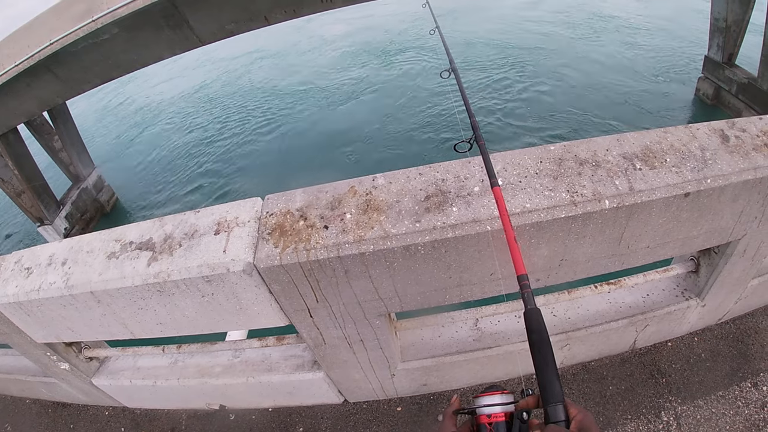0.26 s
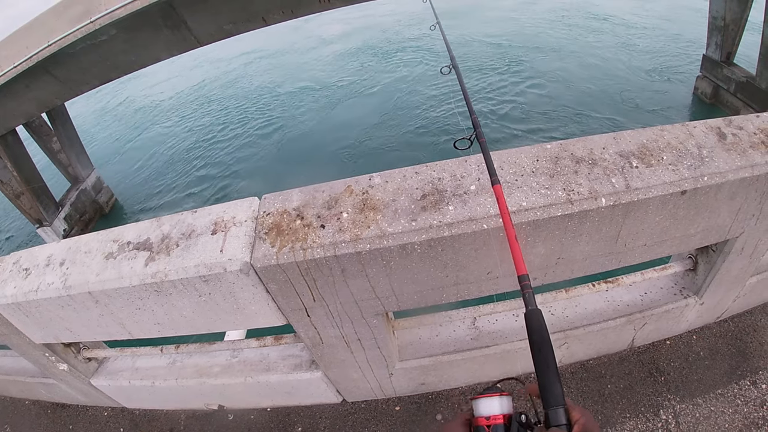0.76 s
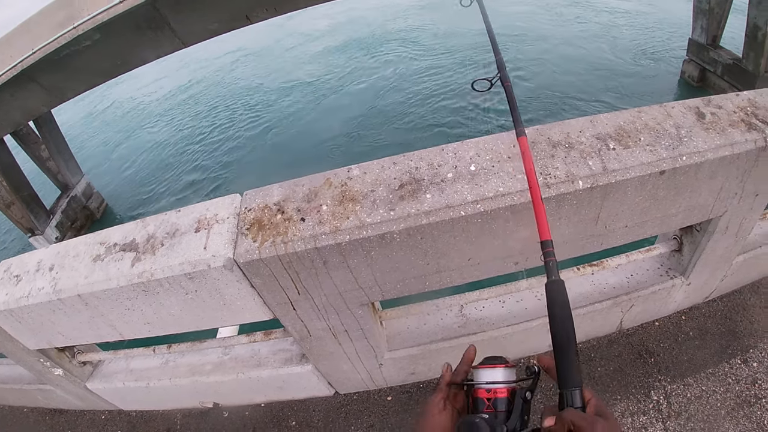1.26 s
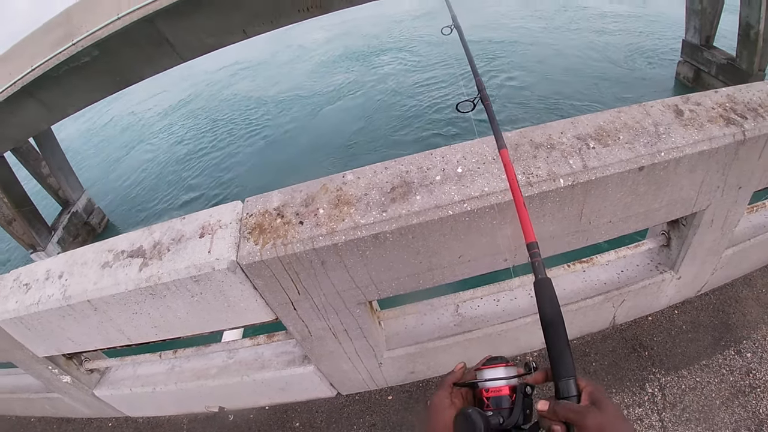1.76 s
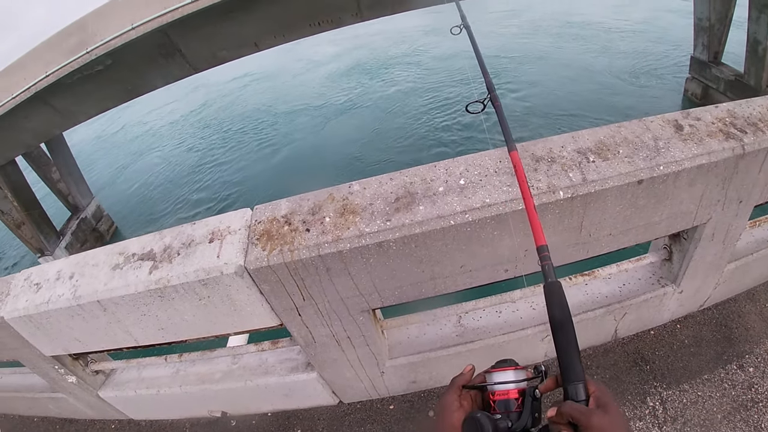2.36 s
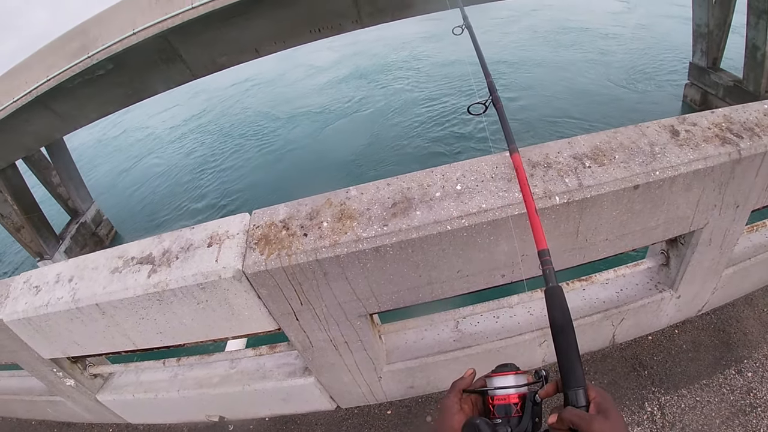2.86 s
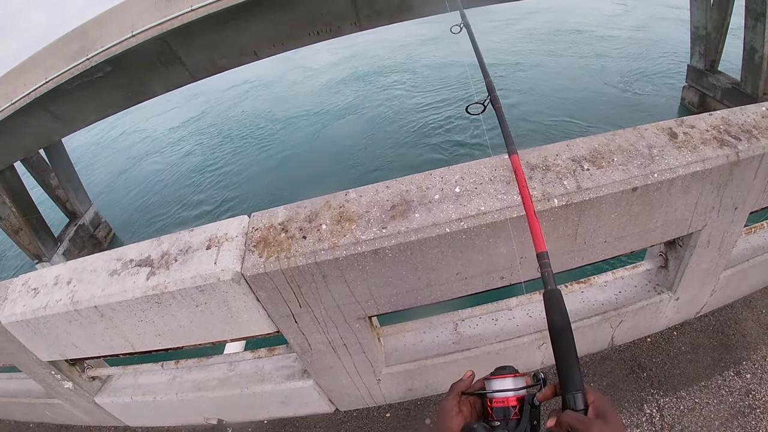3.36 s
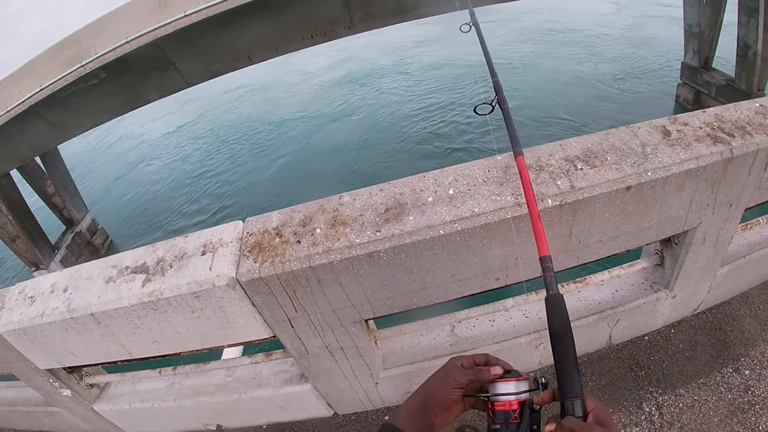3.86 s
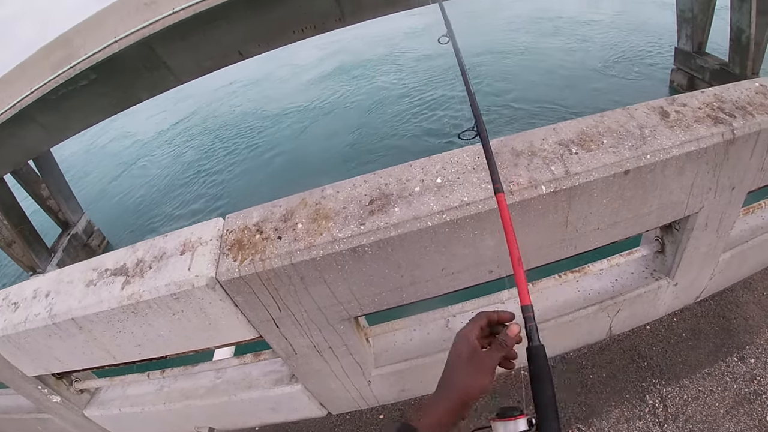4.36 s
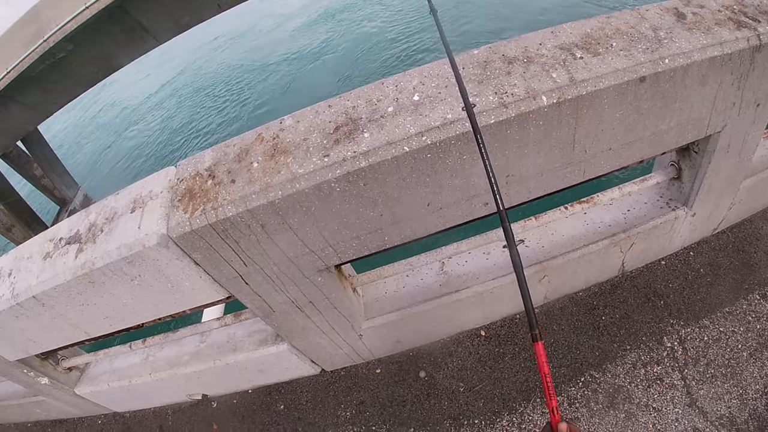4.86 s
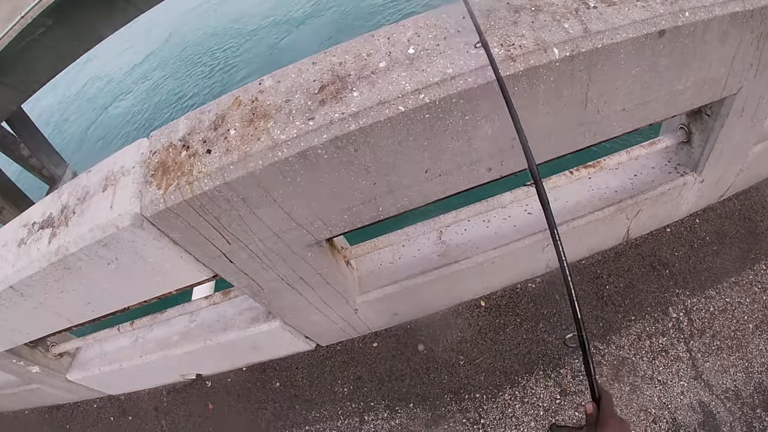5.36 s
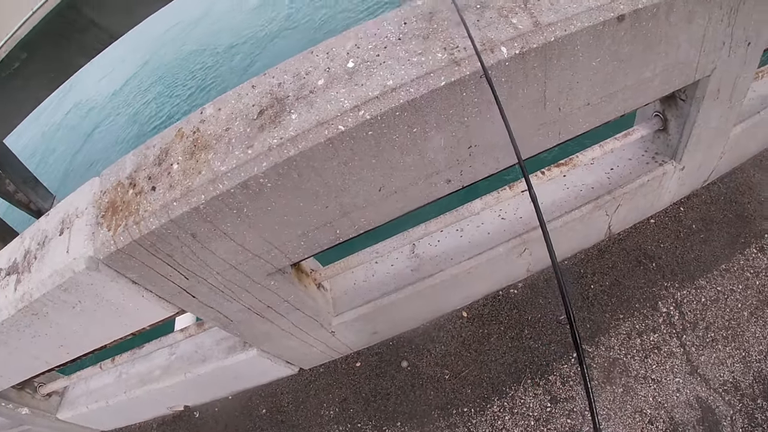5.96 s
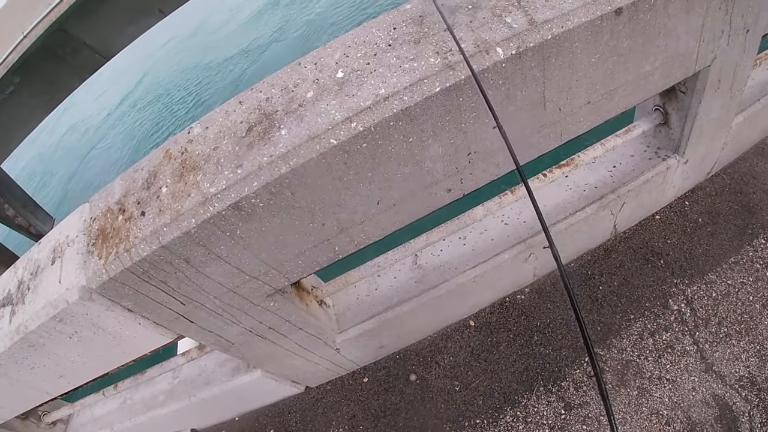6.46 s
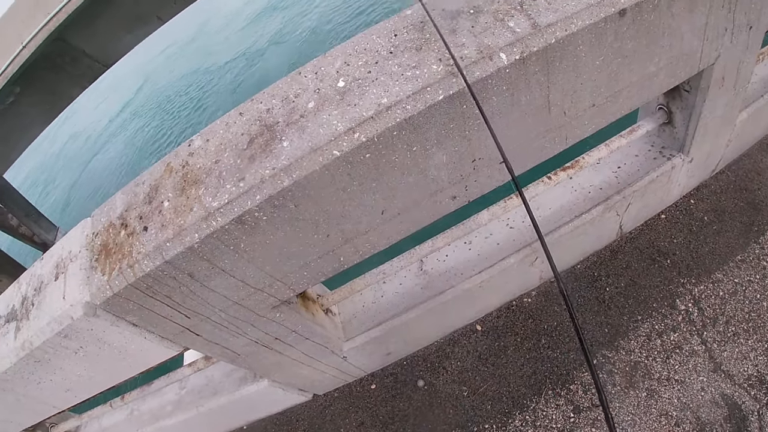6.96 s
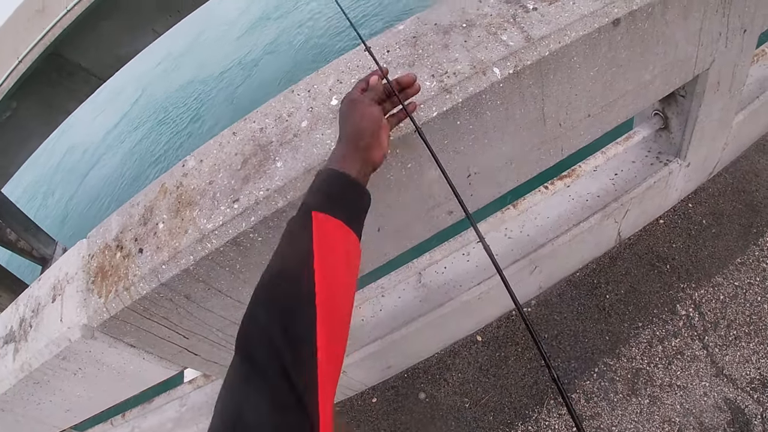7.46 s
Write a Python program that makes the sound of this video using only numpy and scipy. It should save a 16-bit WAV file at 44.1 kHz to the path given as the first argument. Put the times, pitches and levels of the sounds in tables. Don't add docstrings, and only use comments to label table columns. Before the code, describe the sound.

Steady traffic roar and low drone from a bridge overhead, wind buffeting the microphone, with sharp metallic fishing reel clacks early and small ticks afterward.

```python
import sys
import numpy as np
from scipy import signal
from scipy.fft import rfft, irfft, next_fast_len
from scipy.io import wavfile
from scipy.ndimage import uniform_filter1d, map_coordinates

SR = 44100
rng = np.random.default_rng(int(sys.argv[2]) if len(sys.argv) > 2 else 0)


def persist_wave(psi):
    counts = np.round(np.clip(psi, -1, 1) * 32767).astype(np.int16)
    wavfile.write(sys.argv[1], SR, np.atleast_2d(counts).T)


def invert_db(x):
    u = np.asarray(x, float) / 20
    return 10 ** u


N = 340011


def unit(x):
    return x / np.sqrt(np.mean(x ** 2) + 1e-20)


def along(points, hz):
    f, v = np.transpose(points)
    return np.interp(np.log(hz + 1), np.log(f + 1), v, left=-120, right=-120)


def curve(rows):
    s, db = np.transpose(rows)
    return np.interp(np.arange(N) / SR, s, db)


def wobble(rate):
    knots = rng.standard_normal(int(N * rate / SR) + 4)
    return map_coordinates(knots, [np.arange(N) * rate / SR])


def bumps(rows):
    t = np.arange(N) / SR
    return sum(height * np.cos(np.pi * np.clip((t - s) / length, -.5, .5)) ** 2 for s, length, height in rows)


def filtered(x, response):
    m = next_fast_len(len(x) + 8192)
    return irfft(rfft(x, m) * response(np.fft.rfftfreq(m, 1 / SR)), m)[:len(x)]


def rush(spectrum, patchy_db):
    z = signal.stft(rng.standard_normal(N), nperseg=512)[2]
    field = uniform_filter1d(rng.standard_normal(z.shape), size=5, axis=0)
    field = uniform_filter1d(field, size=12, axis=1)
    noise = signal.istft(z * invert_db(patchy_db * unit(field)), nperseg=512)[1][:N]
    return unit(filtered(noise, lambda hz: invert_db(along(spectrum, hz))))


def evened(x, seconds):
    width = round(seconds * SR)
    power = uniform_filter1d(uniform_filter1d(x ** 2, width), width)
    return unit(x / np.sqrt(np.abs(power) + .05))


def narrow(rows):
    out = np.zeros(N + SR)
    flicker = np.pad(invert_db(1.2 * wobble(30)), (0, SR))
    for s, length, hz, width_hz, db in rows:
        start, n = round(s * SR), round(length * SR)
        band = filtered(rng.standard_normal(SR // 2), lambda f: np.exp(-((f - hz) / width_hz) ** 2))
        out[start:][:n] += invert_db(db) * np.hanning(n) * (flicker[start:][:n] * unit(band)[:n])
    return out[:N]


def contacts(rows, colour, cycles, sag=0):
    # frequency in Hz, level in dB per Hz.
    body_colour = [(900, -28), (1400, -1), (2300, 4), (3500, 1), (5000, -6.5), (6500, -12)]
    ring_rise_s, crack_rise_s, sag_s = .0006, 0.00032, 0.00089
    t = np.arange(2048) / SR
    rings, cracks, knocks = np.zeros((3, N + len(t)))
    for s, db, hz, crack_db, body_db in rows:
        at = slice(round(s * SR), round(s * SR) + len(t))
        t60 = np.clip(cycles / hz, .004, .09)
        phase = 2 * np.pi * hz * (t + sag * sag_s * (1 - np.exp(-t / sag_s)))
        rings[at] += invert_db(db - 2.0 - 60 * t / t60) * (1 - np.exp(-t / ring_rise_s)) * np.sin(phase)
        rise = 1 - np.exp(-t / crack_rise_s)
        burst = rise * (invert_db(-60 * t / (0.44 * t60)) + invert_db(-23.0 - 60 * t / 0.075))
        cracks[at] += invert_db(crack_db) * burst * rng.standard_normal(len(t))
        knocks[at] += invert_db(body_db - 60 * t / (1.03 * t60)) * rise * rng.standard_normal(len(t))
    crack = filtered(cracks[:N], lambda hz: invert_db(along(colour, hz) + 13.5))
    knock = filtered(knocks[:N], lambda hz: invert_db(along(body_colour, hz) + 16.5))
    return rings[:N] + crack + knock


def air():
    # frequency in Hz, level in dB per Hz.
    air_colour = [(5500, -20.5), (7500, -2.5), (9200, 0.5), (9900, -3.5), (12750, -8.5), (12900, -29.5),
                  (15600, -51.5)]
    # time in seconds, level in dB.
    air_db = [(0, -81), (.5, -79), (2.5, -76), (4, -75.5), (5.4, -75.5), (6.5, -75.5), (7.71, -73)]
    return invert_db(curve(air_db) + 1.3 * wobble(12)) * rush(air_colour, patchy_db=3.0)


def tyres():
    # time in seconds, level in dB.
    lanes_db = [(0, -27), (.45, -28), (1.3, -30), (1.9, -31.5), (2.8, -29), (3.9, -31), (4.6, -31.5),
                (5.1, -30.5), (5.9, -31.5), (6.7, -31.5), (7.4, -30.5)]
    # time in seconds, gain in dB.
    lorry_db = [(0, 0), (.66, 2), (1.3, 0), (1.5, -1.5), (2.1, -1.5), (3.15, -2.5), (3.6, -4.5), (3.9, -2),
                (4.5, -6.5), (4.8, -4.5), (5.8, -6.5), (6.7, -7.5), (7.4, -3.5), (7.71, -4)]
    # frequency in Hz, level in dB per Hz.
    roar_colour = [(240, -27.5), (400, -1), (488, -5.5), (534, -3.5), (735, -1), (758, -1.5), (955, -4),
                   (1180, -1.5), (1230, -4), (1400, -6), (1820, -50.5), (3080, -120)]
    tread_colour = [(710, -32.5), (1200, -3.5), (1550, 1), (1630, 0.5), (1840, -5), (2200, -14.5),
                    (2860, -37.5), (4840, -120)]
    hiss_colour = [(1500, -24), (1900, -1.5), (2500, -1), (3200, -6.5), (4000, -11.5), (5000, -16),
                   (5800, -19), (6500, -27.5), (8000, -37), (10000, -50.5), (12000, -76)]
    near_db = curve(lorry_db)
    swell = wobble(3.4)
    roar = invert_db(curve(lanes_db) + 0.37 * swell) * rush(roar_colour, patchy_db=0.44)
    tread = invert_db(-31.5 + near_db + 0.42 * swell) * rush(tread_colour, patchy_db=1.04)
    hiss = invert_db(-40 + 0.46 * near_db + 0.32 * swell) * rush(hiss_colour, patchy_db=1.07)
    return roar + tread + hiss


def deck():
    # time in seconds, level in dB.
    drone_level = [(0.0, -23.5), (1.97, -22), (2.9, -30), (3.0, -22), (3.86, -21.5), (4.02, -28.5),
                   (4.23, -23.5), (5.1, -23.5), (5.4, -23), (5.93, -22), (5.95, -18), (6.31, -30), (6.7, -21),
                   (6.76, -30), (7.0, -22), (7.02, -25), (7.3, -30.5), (7.71, -16)]
    # frequency in Hz, level in dB per Hz.
    drone_colour = [(70, -32), (105, -20), (118, -7), (135, -4), (160, 2.5), (195, 0.5), (215, -3.5),
                    (260, -13), (330, -36)]
    # centre in seconds, boom over the drone in dB.
    axles = [(.6, 16), (.71, 15), (.79, 10), (1.56, 8), (1.66, 7), (1.85, 11), (2.02, 8), (2.15, 2),
             (3.13, 12), (3.3, 3), (3.6, 6), (3.87, 6), (4.09, 13), (4.58, 5), (4.81, 0), (4.94, 12),
             (5.15, 6), (5.469, 8), (5.57, 3), (5.87, 5), (5.96, 4), (6.68, 7), (7.62, 0)]
    # frequency in Hz, level in dB, unsteadiness in Hz.
    hum_tones = [(64.8, -34, 2.5), (129.5, -36, 2), (194, -32, 4), (320, -39.5, 3), (779, -47, 4),
                 (1168, -45.5, 2.5)]
    drone_curve = curve(drone_level)
    booms_db = bumps([(s, 0.13, db) for s, db in axles])
    booms_db = booms_db - bumps([(s, 0.2, 0.61 * db) for s, db in axles])
    steady = unit(invert_db(1.1 * wobble(11)) * evened(rush(drone_colour, patchy_db=-0.4), 0.087))
    drone = invert_db(drone_curve + 0.95 * booms_db - 0.4) * steady
    t = np.arange(N) / SR
    hum = np.zeros(N)
    for hz, db, drift_hz in hum_tones:
        cycles = hz * t + np.cumsum(drift_hz * wobble(6)) / SR
        hum += invert_db(db + 0.5 + 0.86 * wobble(4.5)) * np.sin(2 * np.pi * cycles)
    hum_db = .6 * (uniform_filter1d(drone_curve, SR // 4) - np.mean(drone_curve))
    return drone + invert_db(hum_db) * hum


def swells():
    # start in seconds, length in seconds, frequency in Hz, width in Hz, level in dB.
    modes = [(0, 0.28, 146, 24, -26), (.8, .4, 193, 19, -26.5), (1.75, 0.45, 184, 16, -28.5),
             (3.0, .45, 196, 19, -26), (3.45, .4, 194, 19, -31), (4.55, .45, 196, 18, -26),
             (5.0, 0.29, 192, 15, -24), (5.3, 0.33, 187, 14, -21.5), (4.1, .3, 192, 16, -28),
             (.8, .49, 319, 17, -37), (1.8, .49, 319, 15, -36), (4.2, .3, 319, 33, -32),
             (4.6, .49, 323, 13, -34.5), (1.8, 0.31, 1540, 150, -35), (2.3, .45, 1470, 170, -36.5),
             (6.05, 0.11, 68, 12, -17)]
    return narrow(modes)


def wind():
    # centre in seconds, length in seconds, peak in dB.
    gusts = [(0.106, 0.44, -20), (0.76, .12, -20), (1.385, 0.31, -19.5), (1.657, 0.14, -30),
             (2.12, .16, -26), (2.334, 0.42, -15.5), (2.525, 0.23, -18.5), (2.7, 0.31, -21.5),
             (3.01, 0.13, -25), (3.6, 0.17, -32), (3.8, 0.16, -16), (3.915, 0.21, -12), (4.106, 0.18, -24),
             (4.31, 0.29, -20), (4.472, 0.13, -26), (4.736, 0.18, -20), (5.217, 0.29, -24),
             (5.382, 0.18, -17), (5.6, 0.091, -19), (5.668, 0.11, -16), (5.892, 0.33, -17),
             (6.066, 0.19, -10), (6.344, 0.19, -19), (6.502, 0.12, -20), (6.7, 0.27, -17.5),
             (6.808, .2, -18), (6.94, 0.32, -14.5), (7.17, 0.087, -16.5), (7.308, 0.31, -18.5),
             (7.548, 0.32, -15.5), (7.668, 0.19, -14.5)]
    # centre in seconds, length in seconds,
    # change in dB.
    flurries = [(.35, .2, 0), (.64, 0.24, 2), (.78, 0.22, -12), (1.75, 0.61, -2), (3.17, 0.11, 6.5),
                (3.75, 0.087, 2), (3.8, 0.095, -10), (4.19, 0.1, 3), (4.47, .1, 2.5), (4.64, .16, 2),
                (5.28, 0.26, -1.5), (5.51, 0.28, -8.5), (6.0, 0.15, 11), (6.21, 0.44, -18),
                (6.68, 0.1, 11.5), (6.84, 0.17, -16), (6.96, 0.17, 11), (7.1, 0.44, -15), (7.44, 0.18, -2),
                (7.55, 0.25, 5), (7.69, 0.089, 9.5)]
    # frequency in Hz, level in dB per Hz.
    buffet_colour = [(8.8, -28.5), (15, -2), (64, 3), (102, 0), (125, -4.5), (160, -32.5), (280, -120)]
    flutter_colour = [(130, -33.5), (225, -0.5), (280, -1.5), (323, -1.5), (351, -6), (480, -17),
                      (620, -41.5), (1060, -120)]
    breeze = invert_db(-32.5 + 1.6 * wobble(7))
    strength = breeze + bumps([(s, length, invert_db(db - 7.5)) for s, length, db in gusts])
    flutter_db = -29 - 0.39 * np.arange(N) / SR + bumps(flurries)
    eddies = wobble(14)
    buffet = unit(invert_db(1.8 * eddies) * evened(rush(buffet_colour, patchy_db=-0.5), 0.06))
    fast = evened(rush(flutter_colour, patchy_db=-1.0), 0.083)
    flutter = unit(invert_db(0.58 * eddies + 0.64 * wobble(40)) * fast)
    return strength * buffet + invert_db(flutter_db) * flutter


def thumps():
    # start in seconds, peak in dB, frequency in Hz (negative is a pull).
    slams = [(2.298, -3.5, 57), (3.878, -2, 170), (3.92, -4, -52), (5.581, -1.5, 176), (5.594, -6, 66),
             (5.676, -7, 74), (5.933, -4.5, 181), (5.966, -1, 83), (5.999, -4, 55), (6.048, 1.5, 127),
             (6.097, -11, 62), (6.134, -1, 70), (6.195, -6.5, 66), (6.642, -3, -190), (6.679, -5, -60.5),
             (6.722, -5, 53), (6.905, -3, 86), (6.935, -5, 108), (6.959, -7, 91), (6.979, 0, 139),
             (7.001, -10, 121), (7.557, -2, 95), (7.614, -1, -110), (7.63, -0.5, 72), (7.661, -4.5, 52),
             (7.693, 0, 103.5)]
    rise_s = .0008
    t = np.arange(4096) / SR
    out = np.zeros(N + len(t))
    for s, db, hz in slams:
        decay = np.exp(-1.3 * abs(hz) * t)
        swing = np.sin(2 * np.pi * hz * t) * decay * (1 - np.exp(-t / rise_s))
        out[round(s * SR):][:len(t)] += invert_db(db - 2.5) * swing
    return out[:N]


def sleeve():
    # centre in seconds, length in seconds, level in dB.
    brushes = [(.87, .15, -82), (1.2, .12, -75), (3.08, .3, -75), (3.2, .1, -77), (3.43, .08, -76),
               (3.81, .12, -72), (3.9, .12, -78), (4.02, .14, -77), (4.28, .1, -77), (4.42, .15, -80),
               (4.55, .2, -78), (4.78, .18, -76), (4.91, .1, -80), (5.7, .3, -86), (5.888, .04, -70),
               (7.02, .1, -85), (7.52, .06, -81)]
    # frequency in Hz, level in dB per Hz.
    cloth_colour = [(8000, -24), (10000, -5.5), (12000, 1), (13300, -5), (14500, -21.5)]
    strokes = bumps([(s, length, invert_db(db)) for s, length, db in brushes])
    return strokes * invert_db(2.2 * wobble(35)) * rush(cloth_colour, patchy_db=2.0)


def hands():
    # start in seconds, length in seconds, level in dB.
    slides = [(.25, 0.45, -83), (.84, .12, -68), (1.23, 0.07, -66), (2.91, 0.09, -65), (3.0, .35, -69),
              (3.154, 0.072, -70), (3.4, 0.066, -61), (3.75, .11, -53), (.59, .05, -66), (3.93, 0.13, -61),
              (4.23, 0.093, -58), (4.36, 0.22, -67), (4.48, 0.2, -63), (4.72, 0.13, -64), (4.87, .08, -71),
              (5.24, 0.25, -68), (5.53, 0.27, -68), (6.22, .1, -67), (6.9, 0.3, -73), (7.5, .2, -71)]
    # frequency in Hz, level in dB per Hz.
    rub_colour = [(2000, -7), (3000, 3.5), (4500, 9), (7000, 5), (9000, -6), (12000, -8), (13300, -15),
                  (14600, -30)]
    stroke = np.zeros(N + SR)
    for s, length, db in slides:
        n = round(length * SR)
        stroke[round(s * SR):][:n] += invert_db(db) * np.hanning(n)
    sizes = invert_db(np.minimum(3.2 * rng.exponential(size=N), 11))
    snags = sizes * (rng.random(N) < .018) * rng.standard_normal(N)
    grains = unit(filtered(snags, lambda hz: invert_db(along(rub_colour, hz))))
    rub = rush(rub_colour, patchy_db=3.0)
    return stroke[:N] * invert_db(2.5 * wobble(27)) * (0.96 * grains + 0.83 * rub)


def squeaks():
    # start in seconds, length in seconds, frequency in Hz, width in Hz, level in dB.
    slips = [(1.25, .18, 5550, 700, -53), (1.13, .1, 5500, 600, -56), (3.785, .05, 5800, 900, -52),
             (5.2, .45, 9000, 600, -77), (5.55, .3, 2900, 900, -44), (5.52, .3, 4800, 1200, -53),
             (7.44, .27, 3000, 500, -45), (3.763, .089, 3400, 1500, -41), (4.38, .45, 2900, 1000, -44),
             (4.15, .035, 2800, 150, -43), (4.255, .035, 3300, 500, -42), (4.88, .03, 3500, 400, -44)]
    return narrow(slips)


def whistles():
    # start in seconds, length in seconds, end pitch in Hz, top pitch in Hz, level in dB.
    pulls = [
        (1.135, 0.1, 5400, 5880, -56),
        (1.255, .14, 5200, 5820, -50),
        (7.22, .06, 8500, 8650, -76),
        (7.27, .12, 8400, 8550, -74),
        (7.3, .1, 8700, 8800, -75),
        (7.415, .1, 8150, 8650, -69),
        (7.53, .06, 8600, 8800, -76),
        (7.66, .05, 8600, 8800, -76),
    ]
    out = np.zeros(N + SR)
    blur = np.pad(1 + 1.3 * wobble(448), (0, SR))
    for s, length, end_hz, top_hz, db in pulls:
        arch = np.sin(np.linspace(0, np.pi, round(length * SR)))
        at = slice(round(s * SR), round(s * SR) + len(arch))
        phase = 2 * np.pi * np.cumsum(end_hz + (top_hz - end_hz) * arch) / SR
        out[at] += invert_db(db) * arch ** 0.56 * blur[at] * np.sin(phase)
    return out[:N]


def light_touches():
    # start in seconds, ring peak in dB, ring in Hz, crack in dB, body in dB.
    taps = [(2.9447, -45, 3000, -63, -54.5), (2.9806, -45, 3000, -56, -56.5),
            (3.9998, -45, 2800, -58, -55.5), (4.1425, -45, 2770, -62, -55.5), (4.4643, -43, 2800, -65, -54),
            (4.6783, -46, 2840, -63, -55), (4.9776, -45, 2820, -62, -55.5),
            (5.7708, -42, 2780, -64.5, -52.5), (4.2697, -32.5, 3600, -53.5, -44.5),
            (4.889, -26, 3150, -65, -45.5), (4.8895, -36, 3730, -66, -50.5), (5.678, -30, 4800, -61, -48),
            (5.882, -42, 6830, -49, -52), (6.394, -22.5, 3730, -49, -52.5), (6.835, -25.5, 2690, -67, -65),
            (7.485, -28, 2990, -68, -62.5), (7.5, -29, 2850, -73, -59), (6.3945, -45, 7500, -55, -60),
            (6.3945, -40, 4830, -60, -61.5), (.189, -50, 7500, -62, -57.5), (.3556, -54, 6500, -65.5, -58),
            (.7367, -50, 6530, -61, -59.5), (2.4259, -54, 6500, -64.5, -58.5),
            (2.7442, -54, 6440, -65, -57.5), (5.4917, -58, 8500, -67, -59.5),
            (5.792, -56, 8500, -70, -59.5), (7.3689, -52, 8000, -63, -60)]
    # start in seconds, ring peak in dB, ring in Hz, crack in dB.
    small_ticks = [(3.0648, -23, 2920, -56), (3.171, -25, 3300, -49), (3.173, -31, 4020, -55),
                   (3.421, -38, 2910, -50.5), (3.768, -34, 2760, -58.5), (3.964, -35, 2840, -54),
                   (4.028, -26, 2400, -57), (4.0566, -35, 2410, -55), (4.099, -34, 2730, -55),
                   (4.5256, -28.5, 2770, -56.5), (4.553, -30, 2860, -53.5), (5.348, -44, 3300, -59),
                   (5.4458, -44, 2660, -59), (5.59, -37, 2360, -55), (6.894, -39, 2740, -62),
                   (6.93, -36, 2420, -50), (7.3185, -40, 2690, -59)]
    # frequency in Hz, level in dB per Hz.
    soft_colour = [(3500, -24.5), (5000, 6.5), (7000, -1), (9000, -2.5), (11000, -13.5), (13000, -19),
                   (15000, -32)]
    ticks = [(s, db, hz, crack_db - 4, -44.5) for s, db, hz, crack_db in small_ticks]
    return contacts(taps, soft_colour, cycles=130) + contacts(ticks, soft_colour, cycles=60)


def roller():
    # start in seconds, ring peak in dB, ring in Hz, crack in dB, body in dB.
    clicks = [
        (.6117, -26.5, 3705, -44.5, -44),
        (.618, -38, 3670, -54.5, -41.5),
        (2.537, -24.5, 3760, -46.5, -45.5),
        (2.537, -38, 5780, -55, -60),
        (2.537, -38, 7300, -54.5, -59),
        (2.537, -42, 10050, -54, -61),
        (.6117, -40, 7470, -60, -60.5),
        (.6117, -44, 12100, -59.5, -59),
    ]
    # frequency in Hz, level in dB per Hz.
    click_colour = [(3200, -19), (4500, -2), (5900, 1), (7300, 2), (8500, -5), (10000, 1.5), (12500, -12),
                    (15700, -25)]
    return contacts(clicks, click_colour, cycles=190)


def bail():
    # start in seconds, ring peak in dB, ring in Hz,
    # crack in dB, body in dB.
    flips = [(.791, -19, 3010, -55, -33.5), (.807, -46, 3000, -58, -55), (.8641, -4.5, 3020, -31.5, -32.5),
             (.8643, -25, 5720, -44.5, -42.5), (.8642, -22.5, 7130, -49, -50),
             (.871, -32, 3040, -50.5, -41.5), (1.2166, -7.5, 3110, -30, -29),
             (1.2167, -24.5, 5730, -44.5, -38), (1.2166, -25.5, 13000, -55, -49),
             (1.2167, -26.5, 8960, -54, -48.5), (1.2188, -20, 2940, -44.5, -29.5),
             (1.2335, -40, 2360, -52.5, -44.5), (1.2445, -20.5, 3080, -40, -32.5),
             (1.2452, -12.5, 2450, -37, -26), (1.2452, -34, 13000, -55, -50),
             (1.2456, -20, 5580, -46.5, -39.5), (1.2462, -11, 1395, -50.5, -38.5),
             (1.247, -24, 1780, -50.5, -39.5), (1.2484, -15, 2840, -38.5, -30.5),
             (1.2515, -23, 2410, -45, -34), (1.2545, -23, 3080, -48.5, -35.5),
             (5.882, -56, 13800, -55, -70), (5.884, -59.5, 14900, -60, -69), (1.2915, -40, 3290, -53, -45)]
    # frequency in Hz, level in dB per Hz.
    crack_colour = [(3200, -24), (4500, 0), (5800, 6.5), (7200, -1.5), (9000, -3), (12500, -11),
                    (14200, -9), (15700, -22)]
    return contacts(flips, crack_colour, cycles=53, sag=.3)


def scene():
    bridge = tyres() + deck() + swells()
    weather = air() + wind() + thumps()
    gear = sleeve() + hands() + squeaks() + whistles() + light_touches() + roller() + bail()
    return (bridge + weather + gear)[None]


def thinned(x):
    low = filtered(x, lambda hz: hz < 130)
    gust_db = 10 * np.log10(np.abs(uniform_filter1d(low ** 2, SR // 20)) + 1e-9)
    gust_loss_db = np.clip(4 * (gust_db + 19.5), 0, 25)
    start_loss_db = 9 * np.clip(3 - 3 * np.arange(N) / (.3 * SR), 0, 1)
    gain = invert_db(-gust_loss_db - start_loss_db)
    top_band = filtered(x, lambda hz: np.clip((hz - 10200) / 1500, 0, 1))
    return x - (1 - gain) * top_band


def top_cut(x):
    return signal.sosfilt(signal.butter(12, 15700, fs=SR, output="sos"), x)


def record(dry):
    x = dry * np.clip(np.arange(N) / (0.00064 * SR), 0, 1)
    x = x / (1 + np.abs(x / .85) ** 4) ** (1 / 4)
    mix = thinned(x[0])[None]
    return top_cut(mix)


dry = scene()
out = record(dry)
persist_wave(out)
```